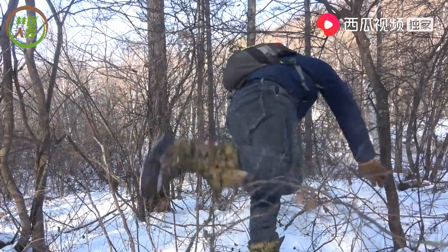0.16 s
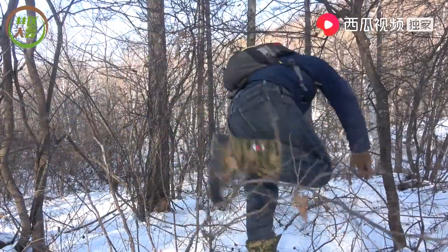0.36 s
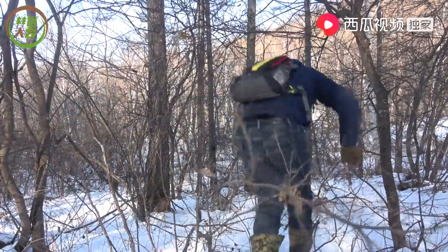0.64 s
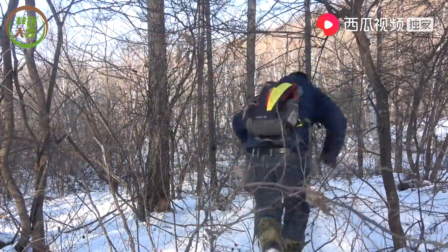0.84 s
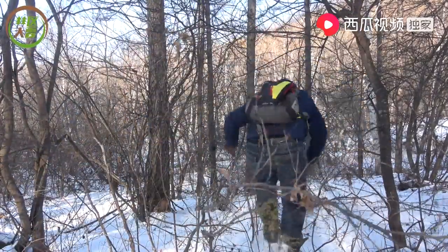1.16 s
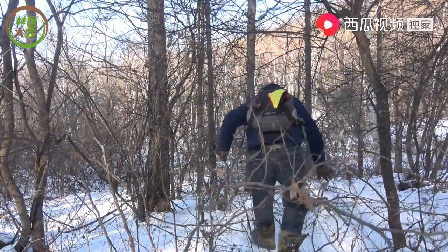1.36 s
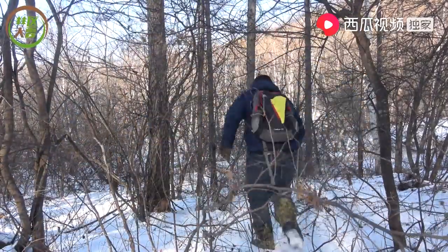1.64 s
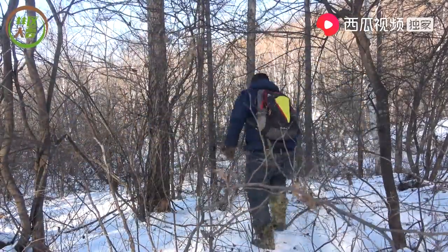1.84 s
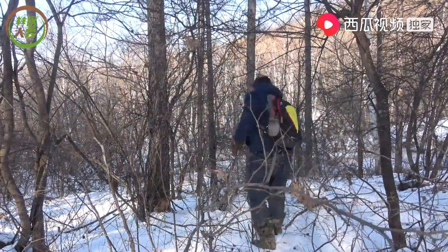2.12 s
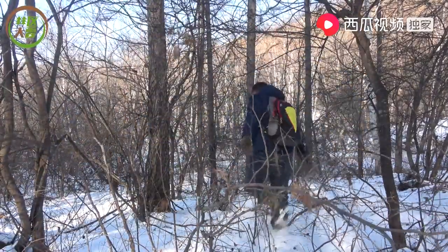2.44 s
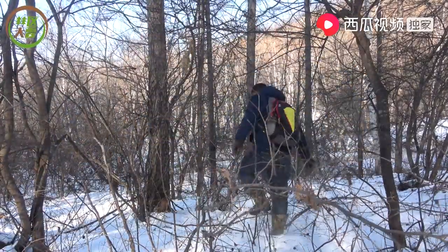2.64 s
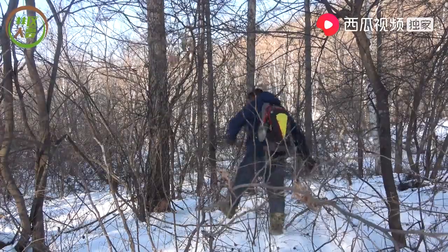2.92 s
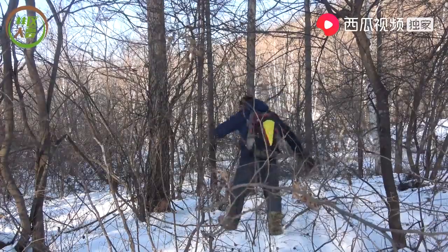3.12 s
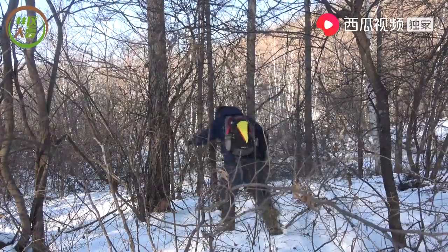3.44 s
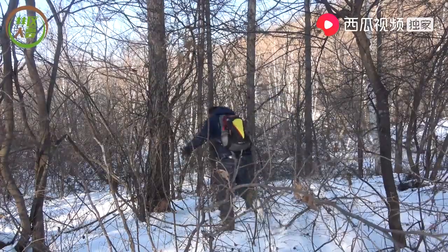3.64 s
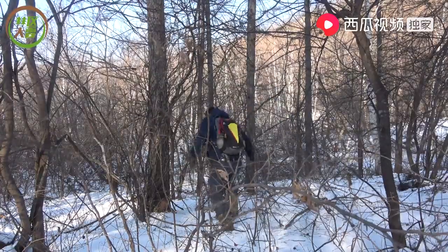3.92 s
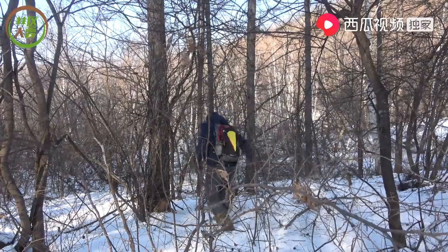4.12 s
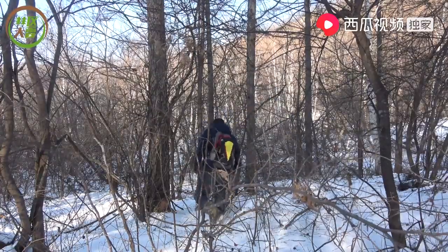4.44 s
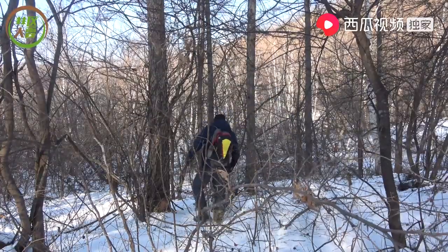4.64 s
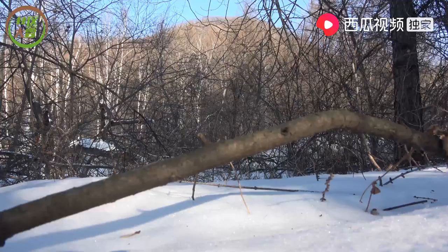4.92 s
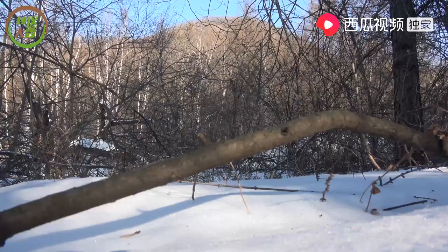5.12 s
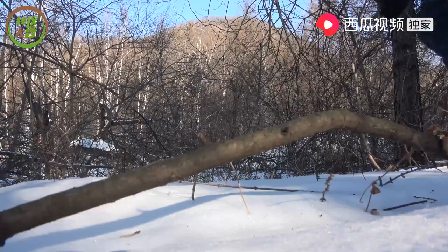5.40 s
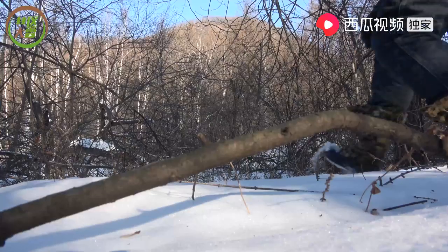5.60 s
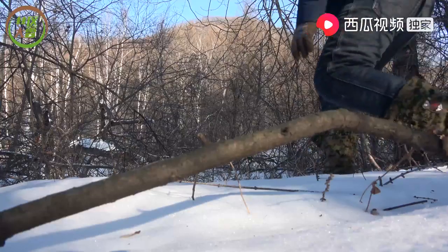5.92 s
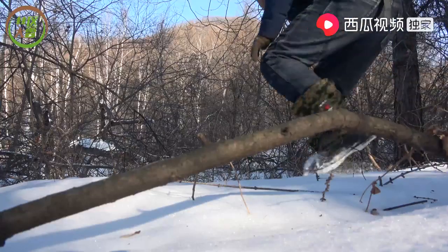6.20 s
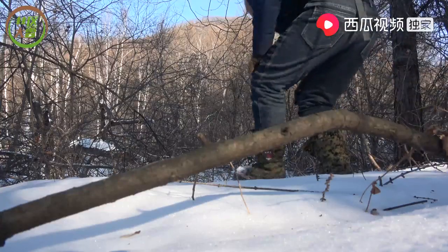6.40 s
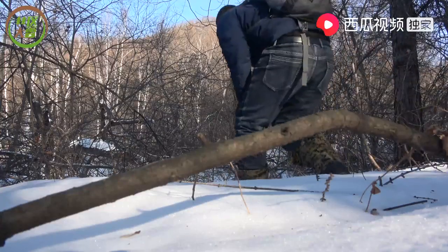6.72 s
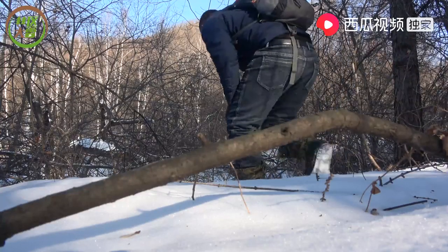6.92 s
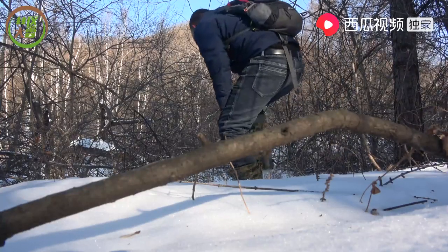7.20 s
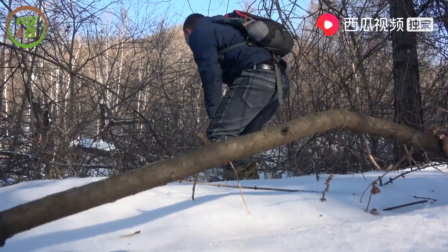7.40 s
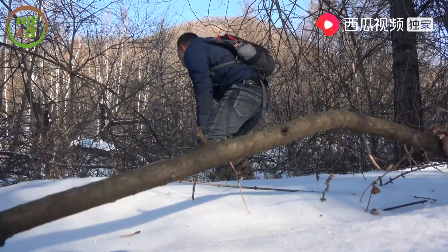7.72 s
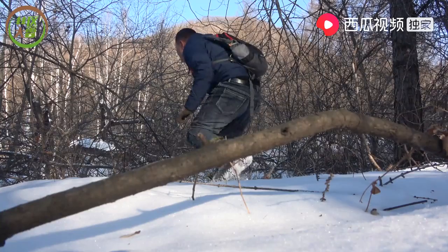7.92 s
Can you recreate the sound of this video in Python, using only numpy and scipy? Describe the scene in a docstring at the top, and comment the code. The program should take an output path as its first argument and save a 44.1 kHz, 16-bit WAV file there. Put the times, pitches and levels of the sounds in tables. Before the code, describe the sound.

Crisp snow crunches and dry branches rasp over clothing, with bright cracks bunching in the first two seconds, then growing softer and sparser. After a cut, boots squeak and grind in close, compact snow, moving from right to centre, with a heavy low press near seven seconds. Quiet outdoor air, faint echo from trunks, no talking.

```python
"""A hiker with a backpack pushes through dry, bare brush in a snowy wood; then the scene changes and the hiker
walks close by. Boots pack and crunch the cold snow: shaped noise of tiny breaks, with stick-slip creaks and low
thuds. Twigs scrape along the clothes, tick, zip over the cloth and snap: ringing clicks and bursts of fibres.
The stereo microphones also take in a faint noise echo from the trunks and the hush of still air."""
import sys
import numpy as np
from scipy import signal
from scipy.io import wavfile

SR = 44100
rng = np.random.default_rng(int(sys.argv[2]) if len(sys.argv) > 2 else 0)


def wrap_up_sound(samples):
    """Save the sound to the file named by the first command line argument, as 16-bit audio."""
    columns = np.atleast_2d(samples).T
    # keep every value between -1 and 1, then stretch to whole-number steps
    tamed = np.clip(columns, -1, 1)
    steps = np.round(tamed * 32767).astype(np.int16)
    wavfile.write(sys.argv[1], SR, steps)


N = 355049
TIME = np.arange(N) / SR
TAPS = 2048  # length of a colouring response, samples
BIN_HZ = np.maximum(np.fft.rfftfreq(TAPS, 1 / SR), 1)
CUTOFF_HZ = 16000
CLOSE_FROM_S = 4.85  # the scene changes: from here the walker is close to the microphones


def from_db(db):
    """Decibels to gain."""
    return 10 ** (np.asarray(db) / 20)


def rms_one(x):
    """Scale to unit power."""
    return x / np.sqrt(np.mean(x ** 2) + 1e-20)


def in_time(rows):
    """Each column of a curve at every sample."""
    s, *columns = np.transpose(rows)
    return [np.interp(TIME, s, c) for c in columns]


def add(track, s, sound):
    """Mix a sound into a track at time s."""
    at = max(round(s * SR), 0)
    track[at:at + len(sound)] += sound[:N - at]


def drift(rate, size):
    """Smooth chance with a spread of about 1 that changes `rate` times a second."""
    at = np.arange(size) * rate / SR
    knots = rng.standard_normal(size // 40 + 4)
    return np.interp(at, np.arange(len(knots)), knots) * np.sqrt(3 / 2)


def shape_db(points):
    """A short spectrum spread over all frequencies."""
    hz, db = np.transpose(points)
    return np.interp(np.log(BIN_HZ), np.log(hz), db)


def knock(db):
    """Causal (minimum-phase) response of unit energy with the given spectrum."""
    cepstrum = np.fft.irfft(np.log(from_db(db)))
    cepstrum[1:TAPS // 2] *= 2
    cepstrum[TAPS // 2 + 1:] = 0
    response = np.fft.irfft(np.exp(np.fft.rfft(cepstrum)))
    return response / np.sqrt(np.sum(response ** 2))


def fractures(per_s, spread_db, size):
    """Random clicks of either sign: many small ones and a few large."""
    chance = rng.random(size) * SR / per_s
    at = np.flatnonzero(chance < 1)
    # the rarer the break, the larger it is
    rarity = np.minimum(-np.log(chance[at] + 1e-12), 4)
    clicks = np.zeros(size)
    clicks[at] = from_db(spread_db * rarity) * (-1) ** at
    return clicks


def grains(colour, per_s, spread_db, clump_db, clump_rate, hiss_db, shimmer_db):
    """Tiny breaks, each ringing briefly in its own octave, in clumps, over smooth friction hiss."""
    edges = np.geomspace(60, CUTOFF_HZ, 9)
    out = from_db(-2.0) * rms_one(fractures(per_s, spread_db, N))
    for low, high in zip(edges, edges[1:]):
        octave = signal.butter(2, [low, high], "band", fs=SR, output="sos")
        breaks = rms_one(fractures(per_s / 2, spread_db, N))
        breaks = breaks + from_db(hiss_db) * rng.standard_normal(N)
        shimmer = from_db(shimmer_db * drift(clump_rate, N))
        out += signal.sosfilt(octave, breaks) * shimmer
    out *= from_db(clump_db * drift(clump_rate, N))
    return rms_one(signal.oaconvolve(out, knock(shape_db(colour)))[:N])


def walking(ticks_db=-8.5, packing_db=-2, crunch_db=-0.7, scrape_db=-0.8, cloth_db=-3, loose_snow_db=-3):
    """The sole packs the snow, the crust crumbles around it, and twigs drag over the cloth."""
    # Clothes and loose snow stir as the walker moves.
    # Each row: time in seconds, relative rustle level in dB.
    rustle = [(0, -39), (1.7, -42), (2.02, -48.5), (2.65, -50), (2.86, -51.5), (3.02, -48.5), (3.25, -45),
              (4.45, -46.5), (4.74, -59), (8.05, -55.5)]
    # Colours of snow under the sole, of crumbling crust and of twigs on cloth.
    # Each row: frequency in Hz, relative level in dB per Hz.
    packing_colour = [(25, -28), (50, -8), (75, -1.5), (110, -0.5), (175, 3.5), (280, -3.5), (420, -11),
                      (900, -29.5)]
    crust_colour = [(120, -19), (280, -6.5), (480, 0), (800, -.5), (1400, -1), (2400, -5.5), (4000, -7.5),
                    (8000, -18.5), (16000, -89)]
    scrape_colour = [(500, -23.5), (1600, -3.5), (3000, -1.5), (5000, 1), (7000, 3.5), (9200, 3.5),
                     (10200, 1), (13000, -2), (14200, -6), (16000, -15)]
    stir = from_db(in_time(rustle)[0]) ** 2
    packed, crushed = treading()
    crunch = np.sqrt(crushed + stir * from_db(loose_snow_db) ** 2)
    rub = np.sqrt(rubbing() + stir * from_db(cloth_db) ** 2)
    packing = grains(packing_colour, per_s=400, spread_db=3.0, clump_db=4.0, clump_rate=60,
                     hiss_db=-5, shimmer_db=2)
    crust = grains(crust_colour, per_s=700, spread_db=3.2, clump_db=1.3, clump_rate=130,
                   hiss_db=-3, shimmer_db=1.6)
    brush = grains(scrape_colour, per_s=1800, spread_db=4.2, clump_db=1.1, clump_rate=170,
                   hiss_db=0, shimmer_db=1)
    ticks = (TIME < CLOSE_FROM_S) * twig_ticks()  # only in the thicket
    snow = from_db(packing_db) * np.sqrt(packed) * packing + from_db(crunch_db) * crunch * crust
    return snow + rub * (from_db(scrape_db) * brush + from_db(ticks_db) * ticks)


def treading(attack_s=0.017, release_s=0.046, pack_build_s=0.022):
    """Weight comes onto the boot, stays and eases off: power of the packing and of the crunch."""
    # A boot sinks in or drags through the snow.
    # Each row: start in seconds, time under load in seconds, relative levels of packing and crust in dB.
    boot_loads = [(0, 0.27, -48.5, -41), (.465, 0.12, -45, -37.5), (.61, .31, -48, -34),
                  (.93, 0.081, -46.5, -41.5), (1.08, 0.12, -53, -44.5), (1.18, 0.3, -54, -39),
                  (1.43, 0.18, -39.5, -36.5), (1.66, .11, -52, -43), (1.86, 0.02, -40.5, -37),
                  (2.07, 0.18, -59, -45.5), (2.169, 0.24, -46.5, -38), (2.45, .17, -50, -43),
                  (3.04, .14, -52, -48), (3.194, 0.23, -47.5, -38.5), (3.45, .28, -61, -43.5),
                  (3.75, .46, -51.5, -43), (4.25, 0.19, -49.5, -40), (4.5, 0.13, -78, -53.5),
                  (4.942, .33, -44, -42), (5.49, 0.098, -46, -42), (5.728, .28, -39.5, -38.5),
                  (6.03, 0.075, -48, -46.5), (6.6, 0.049, -58, -51), (6.64, 0.11, -35.5, -36.5),
                  (6.74, 0.093, -30.5, -40.5), (6.87, 0.056, -35, -45.5), (6.96, .1, -46.5, -55),
                  (7.44, 0.056, -51, -57), (7.53, 0.14, -43, -48.5), (7.68, 0.11, -44.5, -50),
                  (7.84, .07, -44, -47), (7.92, 0.069, -41, -44)]
    packing, crust = np.zeros(N), np.zeros(N)
    t = TIME[:SR]
    for s, hold_s, pack_db, crust_db in boot_loads:
        load = np.minimum(t / attack_s, 1) * np.exp(-np.maximum(t - hold_s, 0) / release_s)
        # the crust breaks at once, the snow under it packs more slowly
        build = 1 - np.exp(-t / pack_build_s)
        add(packing, s, (from_db(pack_db) * load * build) ** 2)
        add(crust, s, (from_db(crust_db) * load) ** 2)
    return packing, crust


def rubbing(roundness=1.24):
    """Each branch presses harder until it slides off: power of the scraping."""
    # A branch drags over the clothes, bends and slides off.
    # Each row: hardest rub in seconds, rise in seconds, fall in seconds, relative level in dB.
    branches = [(0.045, 0.0067, 0.014, -23.5), (.17, 0.18, 0.1, -32.5), (0.314, 0.032, 0.017, -27.5),
                (.5, 0.031, .09, -31), (.7, 0.12, 0.11, -33.5), (.9, 0.11, .15, -33),
                (1.29, 0.053, 0.18, -31.5), (1.54, 0.18, 0.16, -28), (1.87, 0.028, 0.087, -37),
                (2.12, .03, 0.04, -52), (2.34, 0.21, 0.13, -38), (2.53, 0.056, 0.089, -36.5),
                (2.61, 0.082, 0.13, -40.5), (2.99, 0.03, 0.024, -47), (3.28, 0.19, 0.46, -44.5),
                (3.62, 0.029, 0.14, -43), (3.9, 0.065, 0.19, -44), (4.19, 0.13, 0.058, -38),
                (4.41, 0.18, 0.11, -39), (4.55, 0.073, 0.1, -40), (4.87, 0.027, .08, -53),
                (5.28, 0.16, 0.099, -47), (5.78, 0.081, 0.24, -43), (6.72, 0.058, 0.12, -38),
                (6.815, 0.06, 0.047, -37.5), (7.04, 0.018, 0.018, -48.5), (7.275, 0.019, 0.061, -45),
                (7.6, 0.077, 0.15, -45.5), (7.99, 0.036, 0.059, -37.5)]
    power = np.zeros(N)
    for s, rise_s, fall_s, level_db in branches:
        away = np.maximum((s - TIME) / rise_s, (TIME - s) / fall_s)
        # roundness 1 is a pointed swell, 2 a bell
        power += from_db(level_db) ** 2 * np.exp(-2 * np.minimum(away, 10) ** roundness)
    return power


def twig_ticks(per_s=260, spread_db=2.5, cycles=4, contact_s=0.00039, count=18):
    """Thin twigs flick against each other, each ringing for a few cycles at its own pitch."""
    out, t = np.zeros(N), TIME[:SR // 200]
    for hz in np.geomspace(1300, 11000, count):
        r, w = np.exp(-np.pi * hz / (cycles * SR)), 2 * np.pi * hz / SR
        contact = rms_one(rng.standard_normal(len(t)) * np.exp(-t / contact_s))
        flicks = signal.oaconvolve(fractures(per_s / count, spread_db, N), contact)[:N]
        ringing = signal.lfilter([1, 0, -1], [1, -2 * r * np.cos(w), r * r], flicks + 1e-18)
        out += np.sqrt(1 - r) * ringing
    return rms_one(out)


def twig_zip(waver=0.077, waver_rate=SR / 41):
    """The ribs of the cloth pluck the sliding twig: a rough, rising whistle."""
    # A twig tip slides over ribbed cloth, speeding up.
    # Each row: time in seconds, mean ribs per second, relative level in dB.
    slide = [(1.11, 930, -70), (1.135, 1400, -42), (1.15, 2550, -36), (1.168, 3100, -40),
             (1.195, 3400, -44), (1.225, 4400, -48), (1.245, 4600, -70)]
    ribs_per_s, level_db = in_time(slide)
    phase = 2 * np.pi * np.cumsum(ribs_per_s * (1 + waver * drift(waver_rate, N))) / SR
    touching = (TIME > slide[0][0]) & (TIME < slide[-1][0])
    return touching * from_db(level_db + 2.6 * drift(400, N)) * np.sin(phase)


def slips(catch_rate=650, unevenness=.35, attack_s=0.00087, release_s=0.0044,
          surge_db=2.0, surge_rate=190, settle_db=-6, settle_hz=125, settle_s=0.0033):
    """The sole sticks and slips hundreds of times a second, shedding grit, then settles with a soft bump."""
    # Snow gives way under a boot. Each row: start in seconds, length in seconds,
    # relative creak level in dB, creak pitch in Hz, relative grit level in dB.
    slip_rows = [(0, 0.023, -33.5, 1180, -30), (0.029, 0.013, -39, 900, -37),
                 (0.122, 0.02, -38, 1030, -33.5), (0.196, 0.0092, -36, 1050, -41),
                 (.257, 0.013, -38.5, 860, -34), (0.362, 0.012, -31.5, 915, -31.5),
                 (.392, 0.0097, -31, 955, -37.5), (.477, 0.013, -35.5, 480, -29),
                 (0.537, 0.027, -36.5, 1060, -38), (0.709, 0.0088, -28.5, 1120, -26),
                 (0.769, .015, -34, 890, -35), (0.818, .019, -28, 540, -35), (0.846, 0.038, -33, 750, -36),
                 (0.891, 0.0072, -22, 543, -46.5), (1.21, 0.013, -30.5, 930, -36),
                 (1.626, 0.024, -37, 740, -35.5), (2.748, 0.031, -48.5, 760, -51),
                 (2.881, 0.038, -49.5, 336, -54), (4.949, 0.015, -36, 440, -34.5),
                 (4.964, 0.091, -41.5, 810, -38), (5.064, .028, -32, 1030, -35.5),
                 (5.093, 0.035, -37.5, 900, -37), (5.125, 0.0053, -29, 490, -38),
                 (5.134, .043, -33.5, 910, -32.5), (5.186, 0.0074, -29.5, 800, -38),
                 (5.213, 0.013, -32.5, 830, -35.5), (5.244, 0.034, -30.5, 780, -32.5),
                 (5.435, 0.0084, -36.5, 510, -39), (5.486, 0.016, -34.5, 328, -37),
                 (5.515, .045, -39.5, 900, -38), (5.573, 0.0087, -33, 620, -37),
                 (5.594, 0.041, -35, 790, -35.5), (5.701, 0.012, -34, 684, -35),
                 (5.75, 0.073, -34, 470, -42.5), (5.815, 0.011, -28.5, 674, -40),
                 (5.828, .084, -35.5, 610, -48), (5.921, 0.046, -32.5, 510, -47),
                 (5.971, 0.046, -30.5, 506, -42.5), (6.106, 0.0099, -33.5, 570, -43),
                 (6.171, 0.013, -32.5, 494, -45), (6.205, 0.0091, -44, 620, -51),
                 (6.246, 0.02, -36.5, 640, -44.5), (6.309, 0.01, -35, 604, -49.5),
                 (6.401, 0.011, -33.5, 740, -47.5), (6.439, 0.015, -34.5, 720, -45.5),
                 (6.506, 0.029, -46, 474, -58.5), (6.803, 0.02, -33.5, 586, -43),
                 (7.033, 0.017, -42.5, 198.4, -50.5), (7.133, 0.0057, -40, 825, -69),
                 (7.638, .016, -38.5, 220, -50), (7.786, 0.0075, -41.5, 310, -55),
                 (7.927, 0.023, -39, 200, -64)]
    # Packed snow around its creak pitch.
    # Each row: octaves off the pitch in widths, relative level in dB per octave.
    creak_shape = [(-6.5, -47.5), (-2, -13.5), (-1, -7.5), (-.5, -3), (0, 0), (.5, -2), (1, -11), (2, -22),
                   (4, -32), (25, -48)]
    # Colour of shed grit. Each row: frequency in Hz, relative level in dB per Hz.
    grit_colour = [(300, -23.5), (1000, -2), (1800, -0.5), (2600, -1.5), (4500, -5), (8500, -8),
                   (12000, -16), (16000, -27)]
    out, t = np.zeros(N), TIME[:SR // 6]
    for s, length, level_db, pitch, shed_db in slip_rows:
        # higher and cleaner creaks ring more narrowly
        octaves = 1.8 * (705 / pitch) ** 0.83 * from_db(shed_db - level_db) ** 0.44
        load = np.minimum(t / attack_s, 1) * np.exp(-np.maximum(t - length, 0) / release_s)
        load = load * from_db(surge_db * drift(surge_rate, len(t)))  # the snow yields in lumps
        catches = np.cumsum(np.exp(unevenness * rng.standard_normal(200)) / catch_rate)
        strengths = np.exp(unevenness * rng.standard_normal(len(catches)))
        strengths = strengths * rng.choice([-1, 1], len(catches))
        pulses = np.histogram(catches, len(t), (0, t[-1]), weights=strengths)[0]
        # hard-packed snow rings narrowly, loose snow broadly; neither radiates deep bass
        body_db = np.interp(np.log2(BIN_HZ / pitch) / octaves, *np.transpose(creak_shape))
        body_db += 10 * np.log10(BIN_HZ ** 4 / (BIN_HZ ** 5 + 75 ** 5))
        creak = signal.fftconvolve(pulses * load, knock(body_db))
        crumbs = fractures(5000, 2.6, len(t))
        grit = signal.fftconvolve(crumbs * load, knock(shape_db(grit_colour)))
        filled = np.sqrt(length * SR / len(creak))  # levels hold over the slip's length
        slip = from_db(level_db) * rms_one(creak) + from_db(shed_db) * rms_one(grit)
        add(out, s, filled * slip)
        bump_hz = settle_hz * np.exp(0.29 * rng.standard_normal())
        bump = np.sin(2 * np.pi * bump_hz * t) * t / settle_s * np.exp(1 - t / settle_s)
        add(out, s + length - settle_s / 2, from_db(level_db + settle_db) * min(octaves, 1) * bump)
    return out


def thuds():
    """The cushioned sole starts one low, heavily damped swing."""
    # A boot meets frozen ground or a buried branch.
    # Each row: start in seconds, relative level in dB, pitch in Hz, decay in seconds.
    impacts = [(.837, -26, 430, .004), (.481, -22, 337, 0.0023), (1.63, -39, 128, 0.01),
               (2.27, -43, 110, 0.0068), (2.42, -42, 94, 0.0055), (2.77, -43, 197, 0.004),
               (2.905, -40, 280, 0.003), (3.753, -26.5, 504, 0.00095), (4.28, -40, 105, 0.0081),
               (4.35, -39, 122, 0.0067)]
    out, t = np.zeros(N), TIME[:SR // 8]
    for s, level_db, pitch, decay_s in impacts:
        swing = t / decay_s * np.exp(1 - t / decay_s)
        add(out, s, from_db(level_db) * swing * np.sin(2 * np.pi * pitch * t))
    return out


def snaps(crack_s=0.00039, splinter_s=0.0055, skirt_db=24, top_hz=13500):
    """One sharp crack, then a dying spray of tearing fibres, both coloured by the twig."""
    # Twigs break or whip back. Each row: start in seconds, relative level in dB over 5 ms,
    # pitch in Hz, width in octaves, share of splintering from 0 to 1 (at least 0.05 is used).
    twig_rows = [(.1825, -30, 3210, 0.61, 0.6), (.4773, -21, 4300, 0.7, 0.97), (0.5052, -22, 5830, .7, 0.3),
                 (.5131, -24.5, 3580, 0.36, .05), (0.5571, -21.5, 6330, 1, 0.96),
                 (.6221, -27, 2660, 2.1, 0.6), (.6941, -27, 2480, 0.83, 0), (0.8374, -26.5, 1200, 1.1, 0.9),
                 (.8945, -22, 1400, 2.6, 0.7), (0.951, -30.5, 3270, 1, .4), (0.9625, -33, 3890, 2.6, 0.3),
                 (1.0259, -27.5, 2200, 2.2, 0.08), (1.149, -30, 3640, 0.68, 0.7),
                 (1.201, -31.5, 1880, 0.59, 0.6), (1.2526, -26, 6420, 0.68, 0.5),
                 (1.2864, -26, 6580, 0.46, .3), (1.3063, -24, 6540, 1.1, .65),
                 (1.3336, -27, 6680, 0.32, .45), (1.363, -24.5, 6530, 0.7, 0.5),
                 (1.4066, -23.5, 7000, 0.38, 0.8), (1.434, -37, 5190, 1.2, 0.4),
                 (1.4863, -25, 6750, 0.22, 0.7), (1.5352, -20.5, 6450, 0.53, 0.3),
                 (1.5623, -21, 7060, .4, 0.4), (1.734, -27.5, 8250, 0.72, 0.1),
                 (1.834, -29.5, 7200, 0.6, 0.4), (1.8642, -18, 6730, 0.48, 0.44),
                 (1.8662, -24.5, 5500, 1.04, 0.5), (1.8833, -27, 6500, .65, 0.9),
                 (2.0286, -35.5, 7060, 0.44, 0.4), (2.0758, -33, 4680, 1.25, 0.7),
                 (2.1117, -25.5, 7290, 1.06, 0.44), (2.3616, -27.5, 7140, 0.3, 0.5),
                 (2.377, -31.5, 3770, 0.79, 1), (2.7468, -30.5, 4000, 2.3, 0.27),
                 (3.0612, -35.5, 4770, 0.98, 1), (3.1678, -32, 2680, 1.8, 0.9),
                 (3.386, -24.5, 8900, 0.16, 0.6), (3.388, -24.5, 6800, 1.35, 0),
                 (3.5116, -27, 1500, 1.1, .1), (3.603, -35, 7000, .9, 0.95), (3.7542, -32, 1190, 1, 0.7),
                 (3.7774, -33, 1620, 1.1, .1), (3.876, -29, 6600, 0.75, 0.2), (3.885, -24.5, 6840, 1.3, .5),
                 (3.8934, -30, 4580, 3, 0.6), (3.971, -24, 3400, 1.4, 0.5), (4.005, -33.5, 3100, 1.3, 0.4),
                 (4.1268, -28, 6900, 0.81, 0.6), (4.208, -28.5, 4640, 0.65, 0.5), (4.4, -31, 3190, 1.2, .6),
                 (4.5198, -33.5, 7500, 0.39, 0.2), (7.266, -42, 6720, .25, 0.4)]
    out, t = np.zeros(N), TIME[:SR // 30]
    for s, level_db, pitch, octaves, splintering in twig_rows:
        share = np.clip(splintering, .05, 1)
        crack = rng.standard_normal(len(t)) * np.exp(-t / crack_s)
        fibres = fractures(9000, 3.4, len(t)) * np.exp(-t / splinter_s)
        force = np.sqrt(1 - share) * rms_one(crack) + np.sqrt(share) * rms_one(fibres)
        # a broad resonance, ribbed by the bending modes of this twig
        hump = np.exp(-(np.log2(BIN_HZ / pitch) / octaves) ** 2 / 2) * pitch / BIN_HZ
        skirt = from_db(-skirt_db) * BIN_HZ / (BIN_HZ + pitch)
        modes_db = 2.2 * drift(SR / 41, len(BIN_HZ))  # one knot every 41 bins
        # a thin twig radiates little bass, and the air takes off the very top
        radiated = 1 / (1 + (330 / BIN_HZ) ** 3) / (1 + (BIN_HZ / top_hz) ** 8)
        colour_db = 10 * np.log10((hump + skirt) * radiated) + modes_db
        sound = signal.fftconvolve(force, knock(colour_db))
        over_5_ms = np.sqrt(SR / 200 / len(sound))
        add(out, s, from_db(level_db) * over_5_ms * rms_one(sound))
    return out


def wood(x, early_s=0.0093, late_db=-15, t60_s=0.12, size=8192):
    """Ground and near stems scatter early, far trunks return a thin tail; paths change as the walker moves."""
    out, t = np.zeros(N), TIME[:SR // 3]
    decay = (np.exp(-t / early_s) + from_db(late_db - 60 * t / t60_s)) * (t > .002)
    no_bass = signal.butter(1, 500, "high", fs=SR, output="sos")
    for at in range(0, N, size):
        echoes = signal.sosfilt(no_bass, rng.standard_normal(len(t)) * decay)
        echoes = echoes / np.sqrt(np.sum(echoes ** 2))
        add(out, at / SR, signal.fftconvolve(x[at:at + size], echoes))
    return out


def place(x, pan_db, outer_share=0.39):
    """The microphones tell direction mainly in the middle of the range, less in bass and treble."""
    middle = signal.sosfilt(signal.butter(1, [250, 2800], "band", fs=SR, output="sos"), x)
    lean = (from_db(pan_db) - 1) / (from_db(pan_db) + 1)
    return lean * (middle + outer_share * (x - middle))


def still_air(mid_db=-63, side_db=-68.5):
    """The steady hush of the place: coloured noise, independent in mid and side."""
    # Each row: frequency in Hz, relative level in dB per Hz.
    air_colour = [(25, -1), (90, 3.5), (250, 2.5), (550, 2.5), (1100, -3.5), (2000, -37), (4000, -29),
                  (9500, -14), (16000, -23)]
    noise = rng.standard_normal((2, N))
    air = signal.oaconvolve(noise, knock(shape_db(air_colour))[None])[:, :N]
    return from_db(mid_db) * air[0], from_db(side_db) * air[1]


def scene(wood_db=-14, near_wood_db=-9):
    """The walker in a narrow stereo image; the echo gain is higher when the boots are close."""
    # Where the walker is.
    # Each row: time in seconds, left minus right in dB (mid-range), sideways scatter gain in dB.
    positions = [(0, -1.4, -19), (.85, -1.5, -20), (1.3, -.3, -21), (2.5, 0, -26), (4.85, 0, -25),
                 (4.95, -6.8, -21), (5.25, -7, -21), (5.95, -3.2, -20), (6.7, -.1, -21), (8.05, 1.3, -20)]
    # Colour of the sideways scatter. Each row: frequency in Hz, relative level in dB.
    scatter_colour = [(60, 0), (500, -3), (1500, -9), (4000, -4), (8000, 3.5), (15000, 5)]
    pan_db, scatter_db = in_time(positions)
    twigs = snaps()
    steps = walking() + twig_zip() + slips() + thuds()
    echo_gain = from_db(np.where(TIME < CLOSE_FROM_S, wood_db, near_wood_db))
    echo = echo_gain * wood(steps + from_db(5.5) * twigs)
    mid = from_db(1.14) * steps + twigs + echo
    scatter = signal.oaconvolve(wood(steps + twigs), knock(shape_db(scatter_colour)))[:N]
    side = place(mid, pan_db) + from_db(scatter_db) * scatter
    air_mid, air_side = still_air()
    mid = mid + air_mid
    side = side + air_side
    return np.array([mid + side, mid - side])


def record(dry):
    """The top is cut steeply."""
    return signal.sosfilt(signal.ellip(10, .1, 80, CUTOFF_HZ, fs=SR, output="sos"), dry)


dry = scene()
out = record(dry)
wrap_up_sound(out)
```